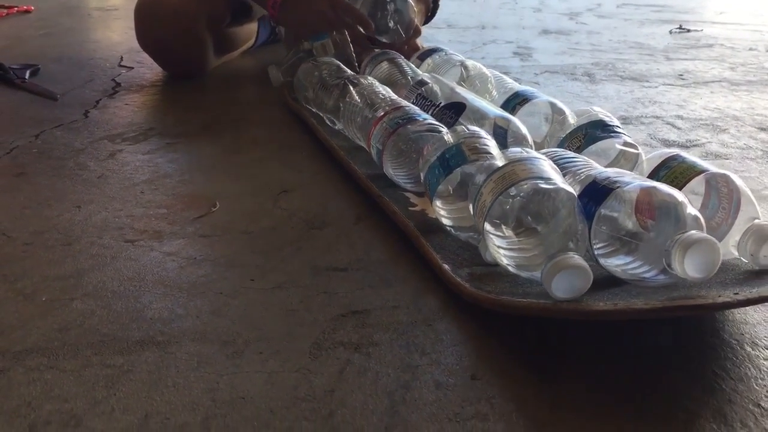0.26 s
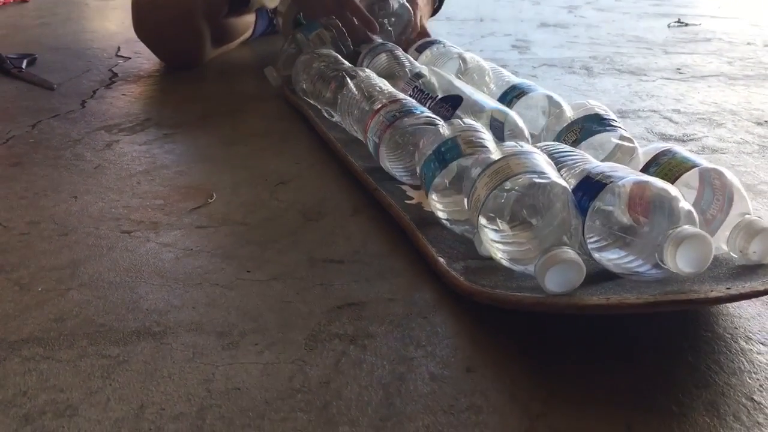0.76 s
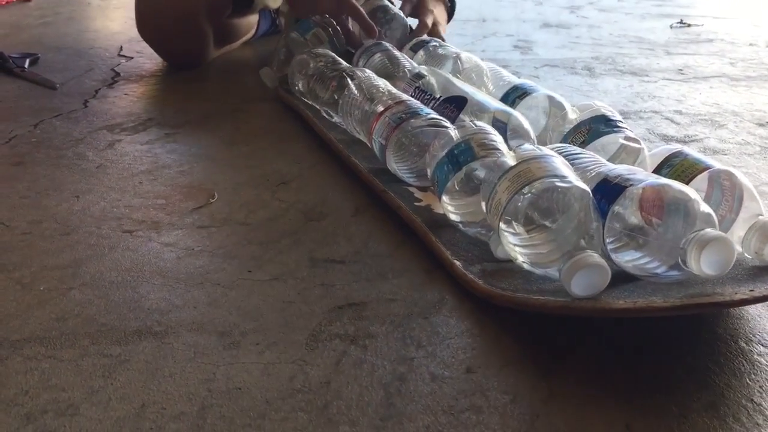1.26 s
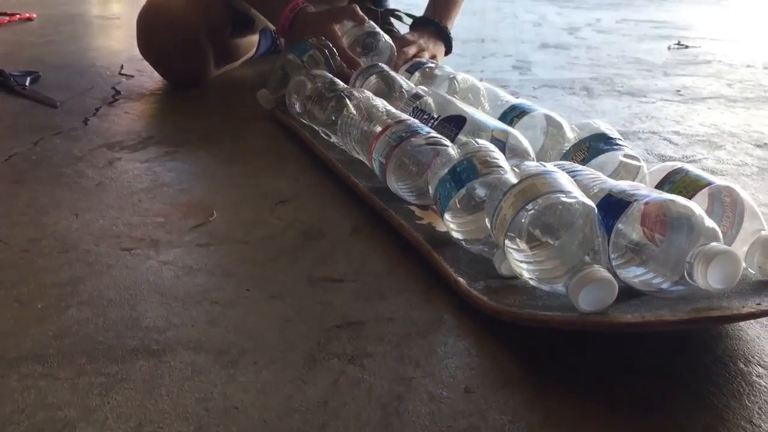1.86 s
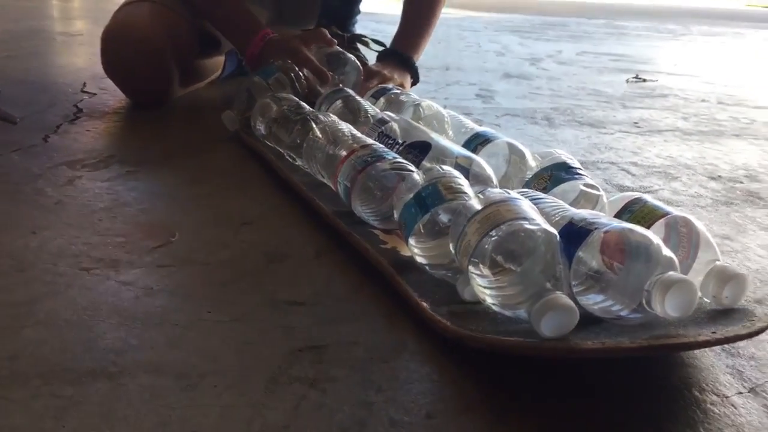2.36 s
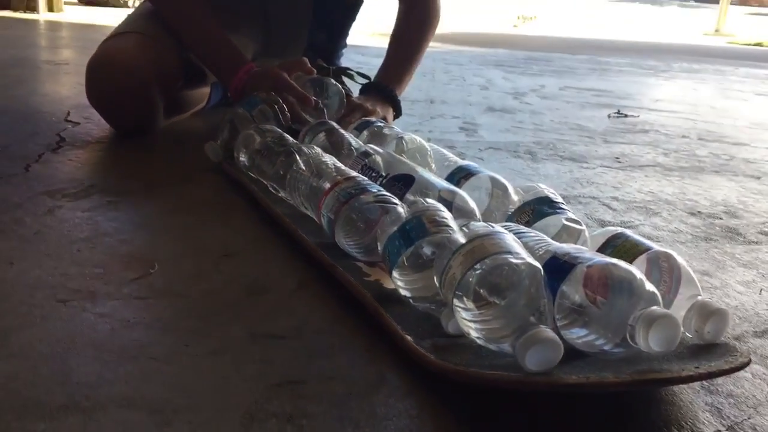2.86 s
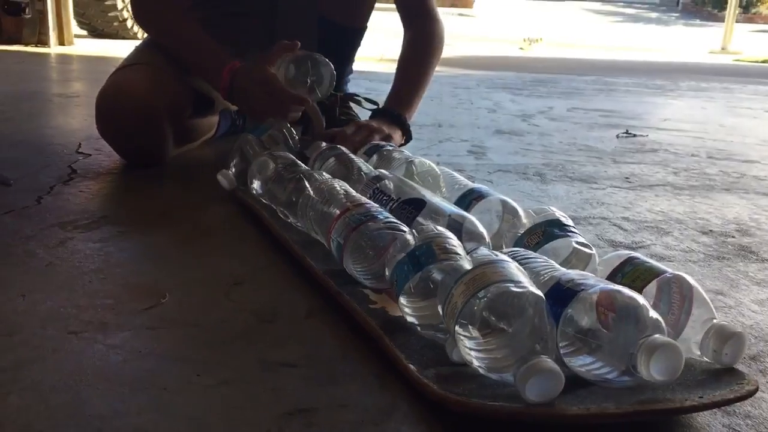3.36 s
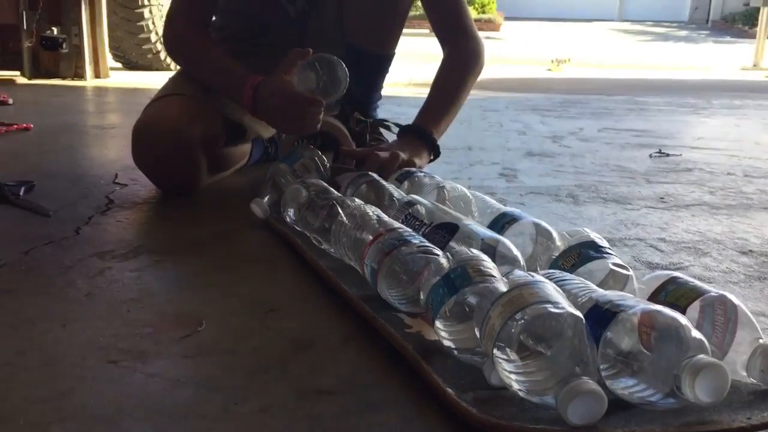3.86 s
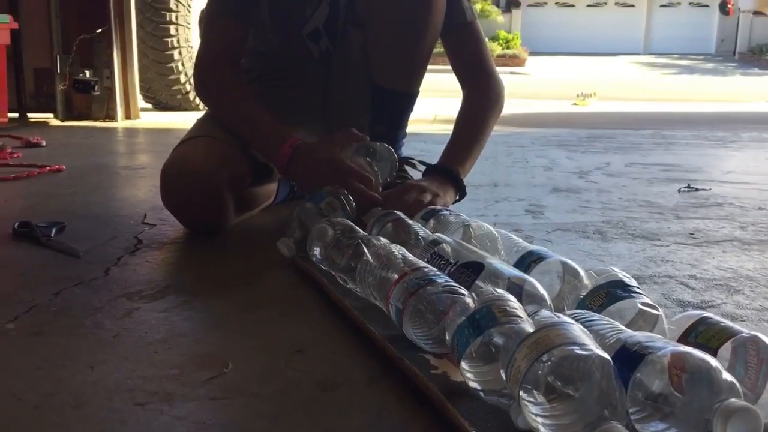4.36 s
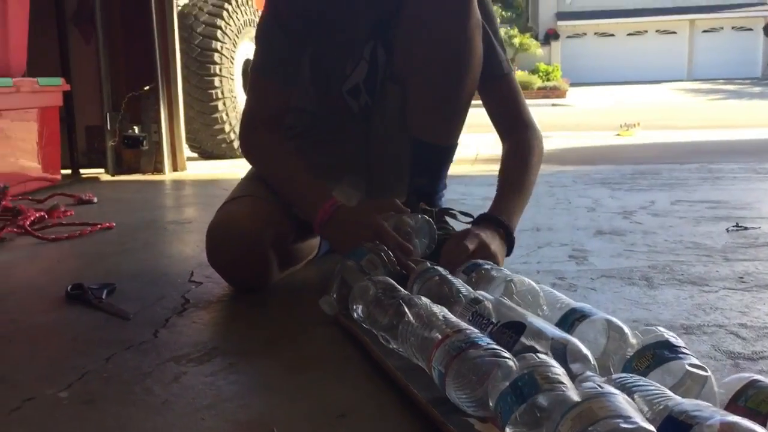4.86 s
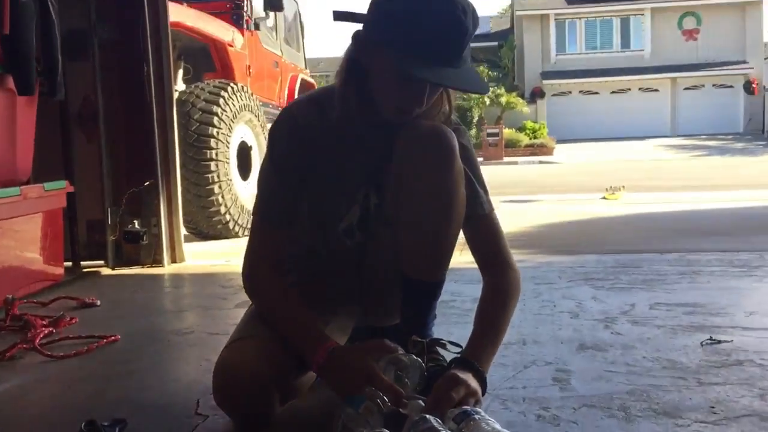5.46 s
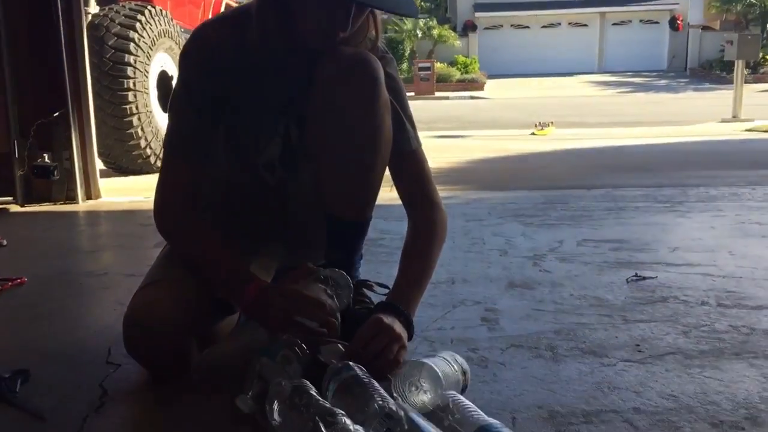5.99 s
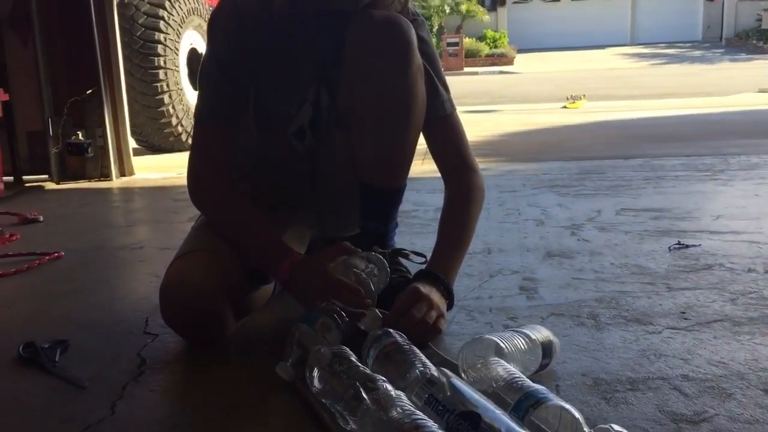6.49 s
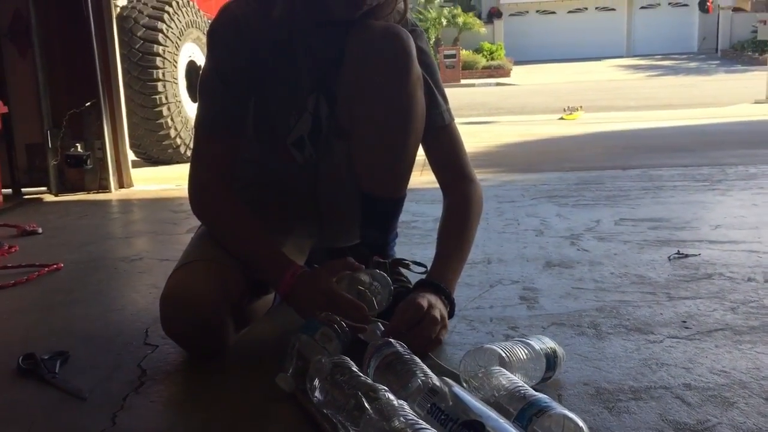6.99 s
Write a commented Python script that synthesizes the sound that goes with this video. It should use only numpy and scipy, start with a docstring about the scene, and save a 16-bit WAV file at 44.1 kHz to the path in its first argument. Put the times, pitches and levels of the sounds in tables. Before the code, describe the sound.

Gritty scrapes over concrete with faint plastic ticks, then sharp, loud snaps of crinkling empty plastic bottles in an echoing garage.

```python
"""An open garage with a bare floor, heard close to a board: a low street rumble and faint hiss fill the quiet.
First something drags in strokes of noise grains over gritty concrete, amid the first dents and knocks of empty
thin plastic bottles; hands rustle on the plastic as clumped ticks. From 2.5 s the snaps come loud and close,
each a burst of slips ringing wall and hollow. Faint squeaks of skin, noise on a drifting pitch, come near
5.7 s, then a thick run of snaps from 6.3 s and a last one at 7 s. Floor and walls throw the near sounds back."""
import sys
import numpy as np
from scipy import signal
from scipy.fft import rfft, irfft
from scipy.io import wavfile
from scipy.ndimage import uniform_filter1d

SR = 44100
rng = np.random.default_rng(int(sys.argv[2]) if len(sys.argv) > 2 else 0)


def to_wav(s):
    """Save 16-bit WAV."""
    ch = np.atleast_2d(s).T  # columns
    pcm = np.round(np.clip(ch, -1, 1) * 32767)  # PCM
    wavfile.write(sys.argv[1], SR, pcm.astype(np.int16))


N = 318843

# how busily the hands shift on the plastic: t/s, level/dB, treble against the level/dB
HANDS = [(0.899, -84, -9), (1.0, -71, -4), (1.17, -78.5, 12.5), (1.54, -66, 3.5), (1.7, -70, 17),
         (1.81, -71, 7), (1.869, -56.5, -1.5), (2.1, -121, 2.5), (2.419, -82.5, 12), (2.53, -77, 25.5),
         (2.89, -68.5, 9), (3.17, -78, 6), (3.232, -51.5, 6), (3.708, -86.5, -12), (3.96, -62, 20),
         (4.3, -87.5, -18), (4.499, -73.5, 9.5), (4.64, -68, -11), (4.76, -68, 11.5), (4.865, -59.5, -6),
         (4.88, -59, -5), (5.05, -78.5, 10.5), (5.529, -73, 4), (5.562, -54, 6.5), (5.75, -78, 9),
         (6.12, -69, 5), (6.24, -67.5, -2), (6.32, -58.5, 0), (6.44, -74, 8), (6.7, -57, -4),
         (6.83, -58.5, -10), (6.998, -111, -13)]


def gain_of(db):
    """Decibels to a factor."""
    return 10 ** (np.asarray(db) / 20)


def evened(x):
    """Scales to rms 1."""
    return x / np.sqrt(np.mean(x ** 2) + 1e-20)


def smoothed_noise(shape, span):
    """Slow random drift: white noise averaged twice over span samples of the last axis."""
    return uniform_filter1d(uniform_filter1d(rng.standard_normal(shape), span), span)


def read(points, hz):
    """Reads a spectrum on a log-frequency axis."""
    f, value = np.transpose(points)
    return np.interp(np.log(hz + 1), np.log(f + 1), value)


def add(mix, s, sound):
    """Mixes a sound in at s seconds."""
    part = mix[round(s * SR):][:len(sound)]
    part += sound[:len(part)]


def coloured(x, spectrum, low_hz=0, high_hz=SR):
    """Gives x the spectrum, split below low_hz, between, and above high_hz; the middle part has rms 1."""
    hz = np.fft.rfftfreq(len(x), 1 / SR)
    z = rfft(x) * gain_of(read(spectrum, hz))
    low = 1 / (1 + (hz / (low_hz + 1)) ** 4)
    high = 1 / (1 + (high_hz / (hz + 1)) ** 4)
    bass, middle, treble = (irfft(z * w, len(x)) for w in (low, 1 - low - high, high))
    return np.array([bass, middle, treble]) / np.sqrt(np.mean(middle ** 2) + 1e-20)


def grains(per_s, spread_db, hiss):
    """Random tiny impacts of uneven size over a fine hiss."""
    size_db = spread_db * np.minimum(rng.exponential(1, N), 4)
    size = gain_of(size_db) * (rng.random(N) < per_s / SR)
    impacts = evened(size * rng.choice([-1., 1.], N))
    return evened(impacts + hiss * rng.standard_normal(N))


def rubbing(noise, spectrum, high_hz, gains):
    """Coloured grains whose bass (below 700 Hz), middle and treble each have a gain."""
    return (coloured(noise, spectrum, 700, high_hz) * gains).sum(0)


def street():
    """Low rumble that swells at listed times and wavers at random, over a steady faint hiss."""
    # colour of the rumble: f/Hz, level per Hz/dB
    rumble_colour = [(21, -62), (35, -30.5), (52, -3), (70, 2), (85, 5), (102, -8.5), (150, -4), (191, -7),
                     (258, -14.5), (286, -25.5), (399, -30.5), (420, -29.5), (550, -50.5), (920, -120)]
    # level of the rumble before its waver: t/s, level/dB
    swell_levels = [(0.0, -57.5), (3.18, -56), (3.26, -49.5), (3.96, -57.5), (4.03, -49.5), (4.17, -58),
                    (4.29, -51), (4.35, -60), (4.75, -51.5), (5.38, -60.5), (6.18, -49.5), (6.68, -60.5),
                    (6.76, -51.5), (7.23, -57)]
    # colour of the hiss: f/Hz, level per Hz/dB
    hiss_colour = [(210, -28), (350, 1), (809, -12), (892, -8), (1540, -9.5), (1870, -8), (2990, -16),
                   (3400, -16.5), (4850, -18), (15200, -28), (16500, -35.5)]
    hiss_db, waver_db, waver_s = -73.5, 1.5, 0.06
    rumble, hiss = (coloured(rng.standard_normal(N), colour, 0, 10 * SR)[1]
                    for colour in (rumble_colour, hiss_colour))
    waver = evened(smoothed_noise(N, round(waver_s * SR)))
    s, db = np.transpose(swell_levels)
    level_db = np.interp(np.arange(N) / SR, s, db) + waver_db * waver
    return gain_of(level_db) * rumble + gain_of(hiss_db) * hiss


def drag():
    """Dense grit under something heavy sliding over concrete: each stroke rises, holds and fades."""
    # strokes: start t/s, rise t/s, hold t/s, level/dB, fade/(dB per s), treble and bass against the level/dB
    strokes = [(0.0, 0.0023, 0.035, -55.5, 190, 15, -1), (0.039, 0.02, 0.0061, -41.5, 187, 14, 3.5),
               (0.353, 0.0046, 0.067, -45, 190, -14, 2.5), (0.434, 0.058, 0.077, -31, 128, 13, 6),
               (0.659, 0.014, 0.0074, -42.5, 141, 13.5, -15), (0.72, 0.02, 0.057, -46.5, 190, -34, -23),
               (1.379, 0.013, .005, -44, 142, -34, 0)]
    # colour of the grit: f/Hz, level per Hz/dB
    grit_colour = [(88, -57.5), (150, -35), (194, -10), (255, -9), (293, -1.5), (401, -9), (571, 2.5),
                   (881, -3.5), (1310, 6.5), (2700, 1), (3850, 0), (15000, -29), (16500, -57)]
    stroke_start_db = -7  # below the hold level
    treble_fade = 1.3  # treble fades this much faster
    grit = grains(per_s=5000, spread_db=1.5, hiss=1.2)
    start, rise, hold, level_db, fade, treble_db, bass_db = np.transpose(strokes)[:, :, None]
    t = np.arange(SR * 2) / SR - start
    swell = (t >= 0) * gain_of(level_db + stroke_start_db * np.clip(1 - t / rise, 0, 1))
    faded_db = fade * np.maximum(t - rise - hold, 0)
    bands_db = bass_db - faded_db, -faded_db, treble_db - treble_fade * faded_db
    # overlapping strokes add by power
    gains = [np.linalg.norm(swell * gain_of(db), axis=0) for db in bands_db]
    return np.pad(rubbing(grit[:SR * 2], grit_colour, 7840, gains), (0, N - SR * 2))


def rustle():
    """Sparse clumped ticks and skin friction on the plastic, its colour shifting in patches."""
    # colour of hands on plastic: f/Hz, level per Hz/dB
    shifting_colour = [(160, -19.5), (280, -15), (444, -9), (517, -21.5), (1570, 2), (3000, -10.5),
                       (3740, -10), (4830, -21), (14200, -28), (15700, -34), (16500, -57.5)]
    clump_db, patch_db, bass_db = 2.6, 2.5, -1.5  # bass against the level
    clumps = evened(smoothed_noise(N, 700))
    ticks = grains(per_s=420, spread_db=1.5, hiss=2.0) * gain_of(clump_db * clumps)
    z = signal.stft(ticks, nperseg=256)[2]
    across_pitch = uniform_filter1d(rng.standard_normal(z.shape), 5, 0)
    patches = evened(uniform_filter1d(across_pitch, 16, 1))
    ticks = signal.istft(z * gain_of(patch_db * patches), nperseg=256)[1][:N]
    s, level_db, treble_db = np.transpose(HANDS)
    bands_db = level_db + bass_db, level_db, level_db + treble_db
    gains = [gain_of(np.interp(np.arange(N) / SR, s, db)) for db in bands_db]
    return rubbing(evened(ticks), shifting_colour, 4300, gains)


def ring(modes, scale, t, chance, rise_cycles):
    """Dying modes with a soft start; every dent detunes them and strikes them unevenly."""
    strike_db = 1.5
    hz, db, t60 = np.transpose(modes)[:, :, None]
    detune, strike, phase = chance[:, :len(modes), None]
    cycles = hz * scale * (1 + 0.015 * detune) * t
    soft_start = (1 - np.exp(-cycles / rise_cycles)) ** 3
    swing = soft_start * np.sin(2 * np.pi * cycles + 1.106 * phase)
    return (gain_of(db + strike_db * strike - 60 * t / t60) * swing).sum(0)


def snaps():
    """Each dent flips in a short burst of slips that rings the wall and the hollow of a bottle.
    Returns the direct sound and what spreads to the walls, where the slips blur into one."""
    # dents and knocks: t/s, peak level/dB of wall, lower wall, hollow, crack and fizz, wall f/Hz, hollow f/Hz
    loud_dents = [(0.2952, -47, -48.5, -71, -63, -86, 2060, 410),
                  (0.654, -48, -68, -30.5, -39, -56, 1910, 592),
                  (1.0136, -41, -44.5, -83, -77, -84, 2150, 380),
                  (1.056, -43.5, -51, -79, -56, -54, 2200, 560),
                  (1.0888, -45.5, -54, -72, -55, -73, 1880, 633),
                  (1.3824, -63.5, -54.5, -30, -63, -78, 1510, 333.3),
                  (1.3909, -35, -50, -18, -55, -64, 2260, 452.3),
                  (1.5454, -45, -53.5, -50.5, -65, -71, 1820, 441),
                  (2.1113, -57.5, -66, -77.5, -79, -47.5, 1575, 308),
                  (2.142, -50, -62.5, -78, -69, -81.5, 2040, 313),
                  (2.5527, -42, -68, -72, -47, -73, 2360, 557),
                  (2.605, -24, -50, -78, -18.5, -17, 2200, 520),
                  (2.7717, -21.5, -36.5, -67, -19, -30, 2600, 540),
                  (3.0253, -18.5, -27.5, -26, -17.5, -23, 1540, 589),
                  (3.028, -30.5, -26, -35, -9.5, -15, 1740, 570),
                  (3.0482, -14, -25.5, -58, -6, -14, 2450, 656),
                  (3.0507, -18.5, -47, -51, -18.5, -10.5, 1980, 581),
                  (3.1975, -34.5, -56, -60, -62, -71, 1880, 670),
                  (3.238, -18, -20, -29, -54, -79, 1820, 639),
                  (3.2469, -23, -38, -22, -33.5, -74, 2340, 558),
                  (3.2764, -52, -26.5, -53, -37, -66, 2000, 653),
                  (3.3597, -34, -40, -42.5, -37.5, -58, 1920, 618),
                  (3.4476, -37.5, -28.5, -37.5, -83.5, -69, 1974, 403),
                  (3.6671, -36.5, -45, -64, -51, -54, 1880, 585),
                  (3.6904, -27.5, -54, -50.5, -29.5, -39.5, 2245, 583),
                  (3.8724, -39, -54, -71, -42.5, -71, 2500, 376),
                  (3.908, -31.5, -43, -54.5, -33, -70, 1895, 665),
                  (4.076, -35, -39.5, -69.5, -28.5, -57, 1720, 604),
                  (4.1107, -40, -58.5, -65, -46.5, -67.5, 3210, 688),
                  (4.4346, -51, -57.5, -60, -60, -64, 2300, 314),
                  (4.5235, -52.5, -69, -58, -59.5, -73.5, 2210, 434),
                  (4.7364, -54.5, -58.5, -53.5, -54, -66.5, 1900, 314),
                  (4.8731, -25.5, -43, -45, -30, -46, 2170, 580),
                  (4.9985, -56, -52.5, -50, -65, -81.5, 1870, 437.6),
                  (5.099, -71, -78, -88, -65, -51.5, 1837, 318),
                  (5.5662, -30.5, -46, -55, -31, -32.5, 2140, 294),
                  (5.5771, -32.5, -34, -25, -34.5, -49, 2220, 467.4),
                  (5.6196, -35, -31.5, -43, -46.5, -77, 1917, 408),
                  (5.681, -44, -42.5, -62.5, -52, -45.5, 1710, 425),
                  (5.8016, -41, -68, -85, -77, -83, 2070, 405),
                  (5.9254, -43.5, -64, -49.5, -66, -60.5, 1650, 376),
                  (5.9333, -27, -67, -40, -41, -32.5, 2220, 449),
                  (5.9881, -35, -46.5, -45, -40.5, -41, 2360, 417),
                  (6.0693, -51, -45, -48, -48, -56, 1720, 418),
                  (6.1055, -52, -57.5, -54, -61, -67, 2280, 378),
                  (6.1377, -43.5, -50.5, -47, -70, -69, 2304, 416),
                  (6.1849, -53, -53, -49, -62, -68, 2500, 455),
                  (6.2548, -38, -41.5, -36.5, -54, -40.5, 1590, 480),
                  (6.2831, -28.5, -44, -41, -29.5, -36, 2070, 304),
                  (6.3615, -14.5, -20, -28.5, -22.5, -71, 2190, 393),
                  (6.4041, -36, -44, -46.5, -33.5, -61, 2540, 439),
                  (6.4893, -34.5, -39, -36, -48, -49, 1660, 576),
                  (6.538, -20.5, -25, -31.5, -35.5, -70, 1734, 402),
                  (6.549, -24.5, -33, -66, -65, -67, 2110, 408),
                  (6.576, -29.5, -29, -35.5, -38.5, -62, 2140, 400),
                  (6.5864, -29, -51, -60, -44.5, -59, 1980, 363),
                  (6.6184, -27, -58, -58, -36.5, -41, 2160, 400),
                  (6.6376, -39, -29.5, -61, -40, -61, 2000, 640),
                  (6.6563, -22.5, -22, -72, -45, -55, 2180, 590),
                  (6.681, -54, -29, -42, -51, -66, 1690, 440), (6.6967, -30, -39, -43, -46, -52, 1710, 545),
                  (6.7325, -33.5, -38, -67, -41, -80, 2020, 466),
                  (6.745, -30.5, -31, -72, -67, -74, 2400, 444),
                  (6.7567, -45.5, -28.5, -50, -73, -77, 1530, 396),
                  (6.776, -37, -47, -42.5, -42, -84, 2400, 364),
                  (6.808, -39, -32.5, -43, -67, -72.5, 1950, 400),
                  (6.8264, -32.5, -58.5, -66, -35.5, -35, 2140, 380),
                  (7.0091, -33, -60, -61.5, -45.5, -34.5, 2300, 283.5)]
    # wall modes: factor on wall pitch, level/dB, t60/s
    wall_modes = [(.72, -11, .014), (.84, -8, .016), (.93, -5, .022), (1, 0, .024), (1.08, -5, .022),
                  (1.2, -8, .015), (1.36, -10, .013), (1.55, -12, .012)]
    # lower wall modes: f/Hz before the common factor 0.91, level/dB, t60/s
    lower_modes = [(765, -6, 0.022), (896, -7, 0.03), (1080, 5.5, 0.023), (1293, 7.5, 0.03),
                   (1370, -4, 0.0046), (1566, -3, 0.022)]
    # modes of air and belly: factor on hollow pitch, level/dB, t60/s
    hollow_modes = [(1, 0, .16), (.9, -8, .09), (1.15, -10, .06), (1.33, -10, .06), (.69, -8, .12)]
    # colour of crack and fizz: f/Hz, level per Hz/dB
    crack_colour = [(1760, -39.5), (3000, -1.5), (6340, 0.5), (7800, -6), (9460, 1), (10700, -7.5),
                    (11400, -2), (12600, -19.5), (14900, -3.5), (15800, -26), (16500, -38.5)]
    burst_ms = 1.1  # the slips die to 1/e in this time
    damped_cycles = 3.5  # neighbours damp the ring that spreads along the row
    t, out = np.arange(6000) / SR, np.zeros((2, N + SR))
    taper = np.exp(-abs(np.arange(256) - 32) / 30)
    clicks = coloured(signal.unit_impulse(256), crack_colour, 0, 9200)[1:]
    crack, fizz = np.roll(clicks, 32, axis=1) * taper
    u = t[:1500] * 1000 / burst_ms
    burst_shape = (1 - np.exp(-u / 0.15)) * np.exp(-u)
    for s, wall_db, lower_db, hollow_db, crack_db, fizz_db, wall_hz, hollow_hz in loud_dents + small_dents():
        chance, slips = rng.standard_normal((3, 3, 8)), rng.standard_normal((2, 1500))
        low, high = slips * abs(slips) * burst_shape
        low[12] += 1.1 * np.linalg.norm(low)  # one main flip sets the wall ringing
        high[12] += 0.23 * np.linalg.norm(high)  # and cracks
        wall = ring(wall_modes, wall_hz, t, chance[0], rise_cycles=0.2)
        lower_wall = ring(lower_modes, 0.91, t, chance[1], rise_cycles=0.36)
        hollow = ring(hollow_modes, hollow_hz, t, chance[2], rise_cycles=0.2)
        # the last column sets how soon the spread sound is damped
        parts = [(wall_db, low, wall, wall_hz), (lower_db, low, lower_wall, lower_modes[2][0]),
                 (hollow_db, low, hollow, hollow_hz),
                 (crack_db, high, crack, wall_hz), (fizz_db, high, fizz, wall_hz)]
        for db, burst, body, hz in parts:
            sound = signal.fftconvolve(burst, body)
            sound *= gain_of(db) / abs(sound).max()
            add(out[0], s - .0006, sound)  # the burst starts just ahead of the listed time
            thud = body * np.exp(-t[:len(body)] * hz / damped_cycles)
            add(out[1], s, thud * np.linalg.norm(sound) / np.linalg.norm(thud))  # same energy, one blow
    return out[:, :N]


def small_dents():
    """Rows like those of the loud snaps, scattered at random and as strong as the hands are busy."""
    # strength against the rustle: level/dB of wall, lower wall, hollow, crack, fizz
    against_rustle_db = (9.5, 5, 8.5, -7, -12.5)
    # lowest and highest wall pitch: f/Hz, f/Hz
    wall_range = (1620, 2580)
    # lowest and highest hollow pitch: f/Hz, f/Hz
    hollow_range = (284.2, 694)
    count, spread_db = 110, 2
    busiest_db = -66  # rustle level beyond which small dents grow no louder
    s, level_db, _ = np.transpose(HANDS)
    when, wall, hollow = rng.random((count, 3)).T
    when = s[0] + (s[-1] - s[0]) * (np.arange(count) + when) / count
    busy_db = np.minimum(np.interp(when, s, level_db), busiest_db)[:, None]
    uneven_db = spread_db * np.clip(rng.standard_normal((count, 5)), -2, 2)
    db = busy_db + against_rustle_db + uneven_db
    pitch = [lo + (hi - lo) * u for (lo, hi), u in ((wall_range, wall), (hollow_range, hollow))]
    return np.column_stack([when, db, *pitch]).tolist()


def squeak():
    """Skin slipping on the wall: a faint fuzzy whistle, narrow noise carried on a drifting pitch."""
    # whistle: t/s, level/dB, f/Hz
    whistle = [(5.661, -59.5, 1620), (5.672, -63, 1697), (5.692, -64.5, 1700), (5.8, -56.5, 1530),
               (5.812, -66, 1565), (5.9, -75.5, 1674)]
    s, db, hz = np.transpose(whistle)
    t = np.arange(N) / SR
    a, b = smoothed_noise((2, N), 200)
    turn = 2 * np.pi * np.cumsum(np.interp(t, s, hz)) / SR
    fuzzy = evened(a * np.cos(turn) + b * np.sin(turn))
    return gain_of(np.interp(t, s, db, -120, -120)) * fuzzy


def garage(direct, spread, tail_db):
    """A few single echoes, then sparse taps of random sign whose bands die at their own speed.
    Three tails take turns at a steady rate, so no single tail colours every snap."""
    # dying of the tail: f/Hz, t60/s
    tail_decay = [(250, 0.6), (660, 0.4), (1740, 0.34), (4590, 0.24), (12100, .17)]
    # echoes off floor, board and near wall: delay t/ms, level against the direct sound/dB
    early_echoes = [(2.3, -25.5), (4.4, -13.5), (6.6, -25.5), (9.5, -12), (14, -24)]
    early, taps = signal.unit_impulse(SR // 20), np.zeros((3, SR // 2))
    for ms, db in early_echoes:
        early[round(ms * SR / 1000)] += gain_of(db)
    # one tap at a random place in every 20 samples
    at = np.arange(300, SR // 2 - 20, 20) + rng.integers(0, 20, (3, (SR // 2 - 301) // 20))
    np.put_along_axis(taps, at, rng.choice([-1., 1.], at.shape), 1)
    hz, t, z = signal.stft(taps, SR, nperseg=256)
    dying = gain_of(-60 * t / read(tail_decay, hz)[:, None])
    tails = signal.istft(z * dying, SR, nperseg=256)[1]
    cycles = np.arange(N) * 9 / SR + np.arange(3)[:, None] / 3  # nine rounds per second
    turns = np.cos(2 * np.pi * cycles) * np.sqrt(2 / 3)
    late = signal.fftconvolve(spread * turns, tails / np.linalg.norm(tails[0]), axes=1).sum(0)
    return signal.fftconvolve(direct, early)[:N] + gain_of(tail_db) * late[:N]


def scene():
    """Near sounds pass the garage; the street comes in through the open door."""
    near = snaps() + drag() + rustle() + squeak()  # two rows: direct, and spread to the walls
    return (garage(*near, tail_db=-9.5) + street())[None]


def record(dry):
    """The microphone drops the deepest bass and dips a narrow band; then the band limit of the recorder."""
    edge_hz = 16200
    thinned = signal.sosfilt(signal.butter(3, 42, "high", fs=SR, output="sos"), dry)
    # the port cavity partly cancels a narrow band at 10500 Hz
    notched = signal.lfilter(*signal.iirnotch(10500, 7.0, SR), thinned)
    dipped = 0.56 * notched + 0.69 * thinned
    band_limit = signal.firwin(511, edge_hz, window=("kaiser", 9), fs=SR)
    return signal.oaconvolve(dipped, band_limit[None], "same")


dry = scene()
out = record(dry)
to_wav(out)
```